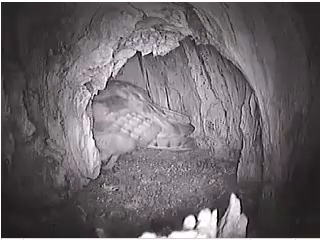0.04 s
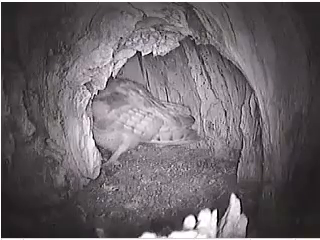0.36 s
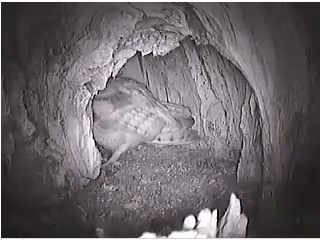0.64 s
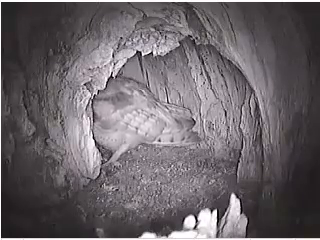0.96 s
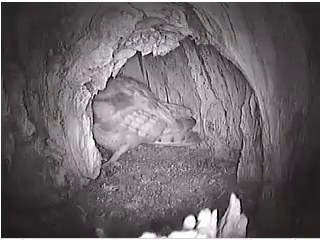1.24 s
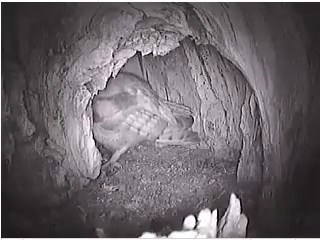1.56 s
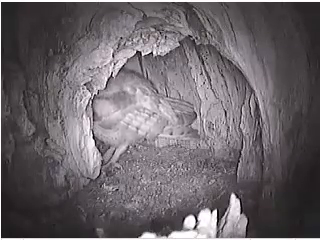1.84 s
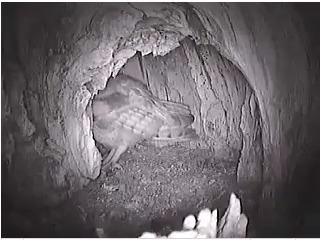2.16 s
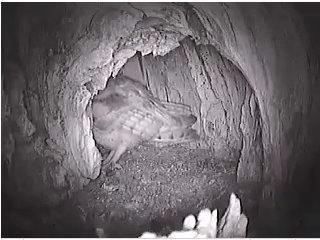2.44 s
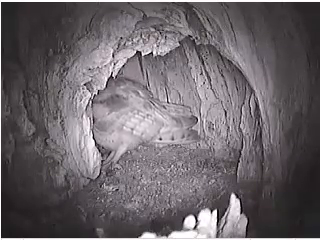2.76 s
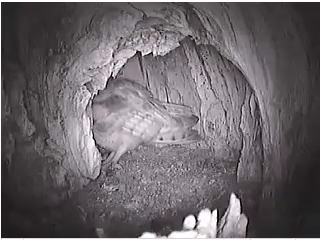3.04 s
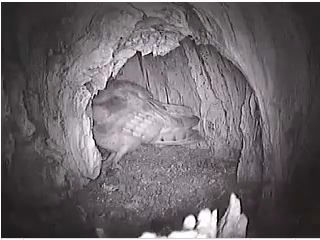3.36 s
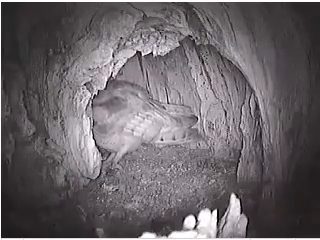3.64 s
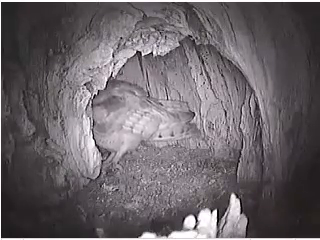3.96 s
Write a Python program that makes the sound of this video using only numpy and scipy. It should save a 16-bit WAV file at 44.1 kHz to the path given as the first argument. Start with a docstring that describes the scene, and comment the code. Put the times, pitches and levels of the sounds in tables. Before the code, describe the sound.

A distant owl gives one soft trill, heard from inside a tree hollow under steady microphone hiss and low electrical hum. At about 0.6 seconds, ten short, pure hoots begin on nearly one pitch, speeding up like a bouncing ball. They swell around 1.4 seconds, ease off and end near 2.1 seconds with a slight woodland echo. The hum and hiss continue alone until about 4 seconds.

```python
"""A distant owl gives one soft trill: ten short hoots that speed up like a bouncing ball, swell, ease off.
Each hoot is a pure tone arching in level and pitch, drawn out by close reflections, blurred by the woods.
It is heard at night from inside a tree cavity, through a nest camera
whose own steady hiss and mains hum lie over everything."""
import sys
import numpy as np
from scipy import signal
from scipy.fft import rfft, irfft, next_fast_len
from scipy.io import wavfile
from scipy.ndimage import map_coordinates

SR = 44100
rng = np.random.default_rng(int(sys.argv[2]) if len(sys.argv) > 2 else 0)


def pcm_store(signal):
    """Save signal as 16-bit PCM."""
    levels = np.round(np.clip(np.atleast_2d(signal), -1, 1) * 32767)
    wavfile.write(sys.argv[1], SR, levels.astype(np.int16).T)


N = 176400  # 4 s


def amp(db):
    """dB to gain."""
    return 10 ** (np.asarray(db) / 20)


def unit(x):
    """Scale to rms 1."""
    return x / np.sqrt(np.mean(x ** 2) + 1e-20)


def wobble(knots_per_s):
    """Smooth random curve."""
    knots = rng.standard_normal(int(N * knots_per_s / SR) + 4)
    return map_coordinates(knots, [np.arange(N) * knots_per_s / SR])


def filtered(x, response):
    """Apply response(f/Hz) to x."""
    size = next_fast_len(N + SR // 2)
    return irfft(rfft(x, size) * response(np.fft.rfftfreq(size, 1 / SR)), size)[:N]


def noise(spectrum):
    """Noise of rms 1, shaped by (f/Hz, level/dB) points on a log axis."""
    f_hz, db = np.transpose(spectrum)
    white = rng.standard_normal(N)
    return unit(filtered(white, lambda hz: amp(np.interp(np.log(hz + 1), np.log(f_hz + 1), db))))


def hiss():
    """Microphone noise floor: low rumble, broad hiss, faint narrow whine, a trace of sizzle on top."""
    # relative noise densities: f/Hz, level/dB
    rumble_shape = [(10, -12.5), (20, -13), (36, -3), (65, 3.5), (100, -4), (180, -9.5), (300, -11),
                    (500, -13.5), (750, -18), (1200, -27), (3000, -50)]
    hiss_shape = [(100, -2.5), (900, 2), (2000, 0.5), (3950, -1), (4100, -4.5), (5100, -6.5), (5750, -6.5),
                  (6000, -11), (6280, -13), (6450, -6), (7300, -11)]
    sizzle_shape = [(8600, -72.5), (8760, -1.5), (9100, -11), (9450, -13.5), (9700, -23.5)]
    rumble_db, hiss_db, sizzle_db = -53.5, -54.5, -90
    whine_hz, whine_width_hz, whine_db = 5477, 190, -69.5
    cutoff_hz = 7320
    white = rng.standard_normal(N)
    whine = unit(filtered(white, lambda hz: 1 / (1 + 2j * (hz - whine_hz) / whine_width_hz)))
    floor = amp(rumble_db) * noise(rumble_shape) + amp(hiss_db) * noise(hiss_shape)
    floor += amp(whine_db) * whine
    return filtered(floor, lambda hz: hz < cutoff_hz) + amp(sizzle_db) * noise(sizzle_shape)


def mains_hum():
    """Strong, slightly wavering fundamental; odd harmonics dent each crest into a soft buzz."""
    # odd mains harmonics: multiple, rms level/dB
    harmonics = [(1, -38), (3, -57), (5, -60.5), (7, -61), (9, -64), (11, -68), (13, -76), (15, -79),
                 (17, -78.5), (19, -78.5), (21, -82.5)]
    mains_hz, waver_db = 60, -0.2
    phase = 2 * np.pi * (mains_hz * np.arange(N) / SR + rng.random())
    fundamental, *buzz = [amp(db) * np.cos(k * phase) for k, db in harmonics]
    waver = amp(waver_db * wobble(knots_per_s=7.2))
    return np.sqrt(2) * (fundamental - sum(buzz)) * waver


def owl():
    """Pure-tone hoots: level and pitch rise and fall with effort; reflections draw each one out."""
    # hoots: t/s, length/s, level/dB, f/Hz
    hoots = [(0.61, 0.084, -53, 606), (.824, .088, -48, 617), (1.029, .1, -47, 620),
             (1.23, 0.089, -45.5, 618), (1.407, .1, -44.5, 619), (1.576, 0.084, -45.5, 617),
             (1.712, 0.072, -46, 616), (1.826, 0.094, -47.5, 618), (1.930, 0.082, -48, 619),
             (2.036, 0.079, -46.5, 614)]
    arch_hz, quaver_hz = 14, 5
    linger_s, linger_share, echo_db = 0.035, 0.5, -15
    t, trill = np.arange(N) / SR, np.zeros(N)
    quaver = quaver_hz * wobble(knots_per_s=70)
    pole = np.exp(-1 / (linger_s * SR))
    for start_s, length_s, db, hz in hoots:
        effort = np.sin(np.pi * np.clip((t - start_s) / length_s, 0, 1))
        pitch_hz = hz + arch_hz * (effort - np.pi / 4) + quaver
        linger = signal.lfilter([1 - pole], [1, -pole], effort)  # close reflections
        envelope = (1 - linger_share) * effort + linger_share * linger
        hoot = amp(db) * envelope * np.sin(2 * np.pi * np.cumsum(pitch_hz) / SR)
        trill += hoot + amp(echo_db) * woods_echo(hoot)
    return trill


def woods_echo(x, t60_s=0.42, delay_s=0.02):
    """Diffuse echo from the trunks, at the rms of x."""
    t = np.arange(SR // 2) / SR
    tail = rng.standard_normal(len(t)) * np.exp(-np.log(1000) * t / t60_s) * (t > delay_s)
    echo = signal.fftconvolve(x, tail)[:N]
    return unit(echo) * np.sqrt(np.mean(x ** 2))


def scene():
    """Far owl under the camera's hiss and hum; mono."""
    return (hiss() + mains_hum() + owl())[None]


def record(dry):
    """Camera band limit: brick-wall low-pass."""
    cutoff_hz = 9690
    return np.array([filtered(channel, lambda hz: hz < cutoff_hz) for channel in dry])


dry = scene()
out = record(dry)
pcm_store(out)
```